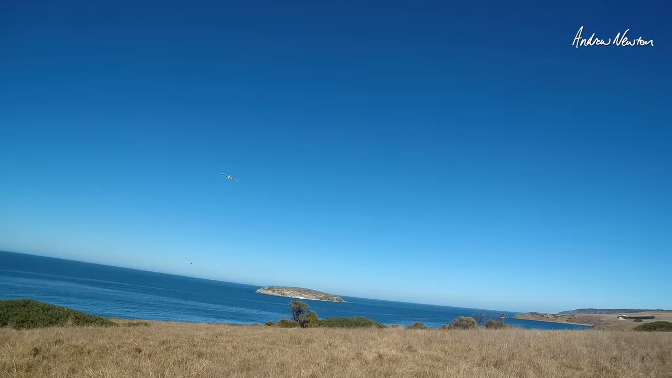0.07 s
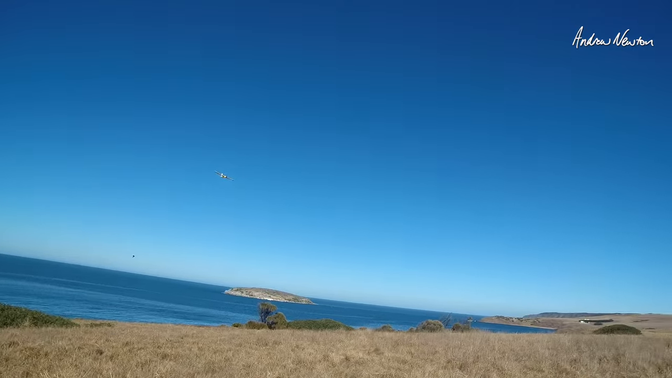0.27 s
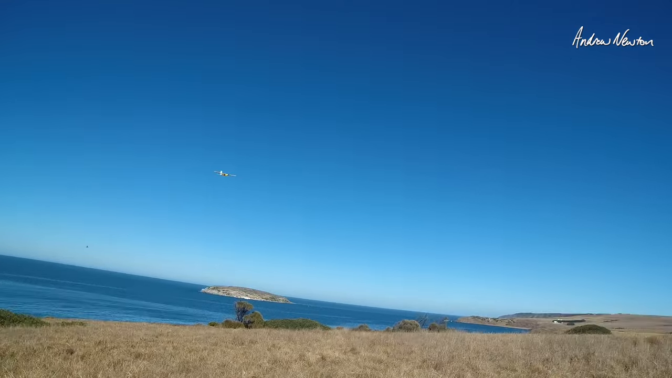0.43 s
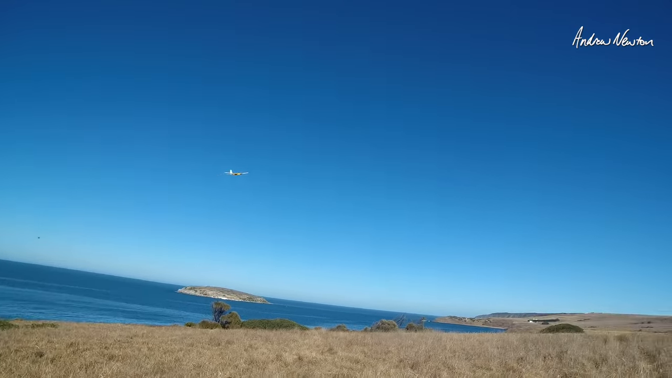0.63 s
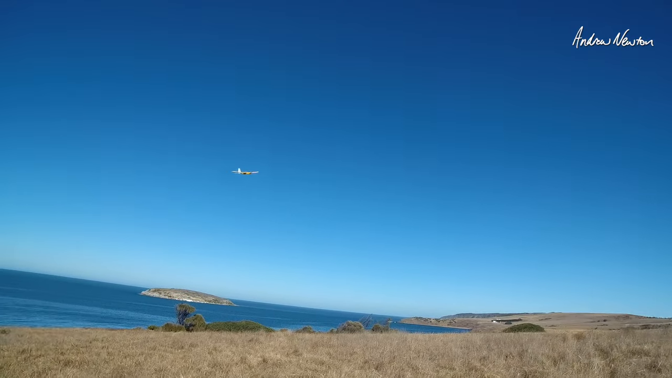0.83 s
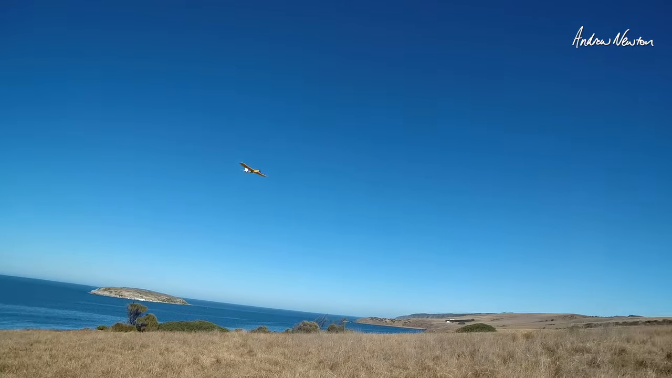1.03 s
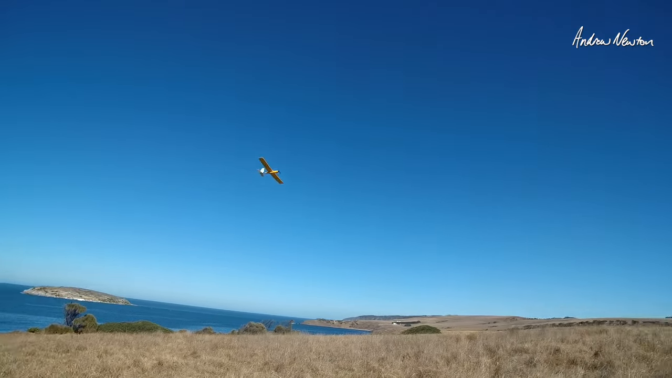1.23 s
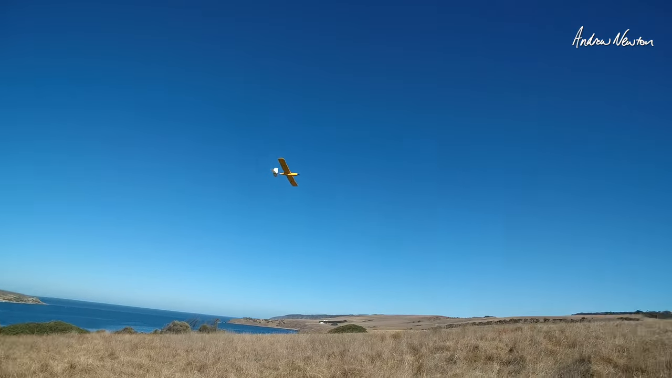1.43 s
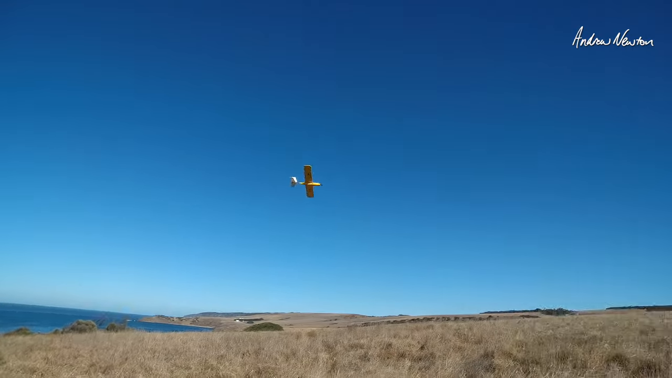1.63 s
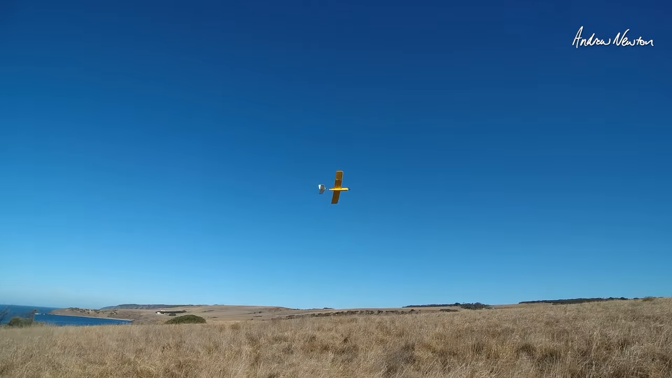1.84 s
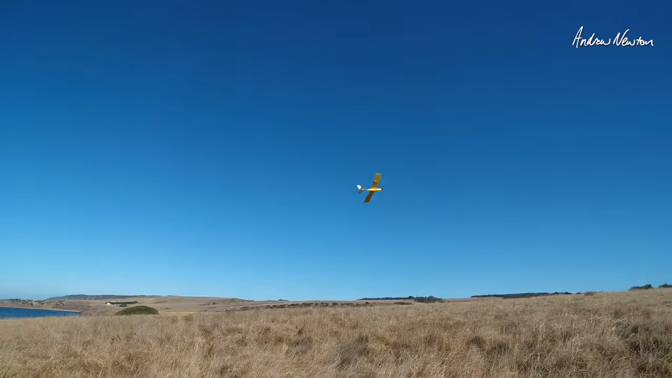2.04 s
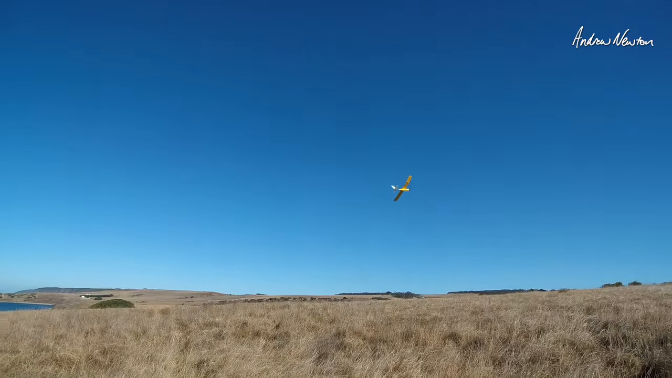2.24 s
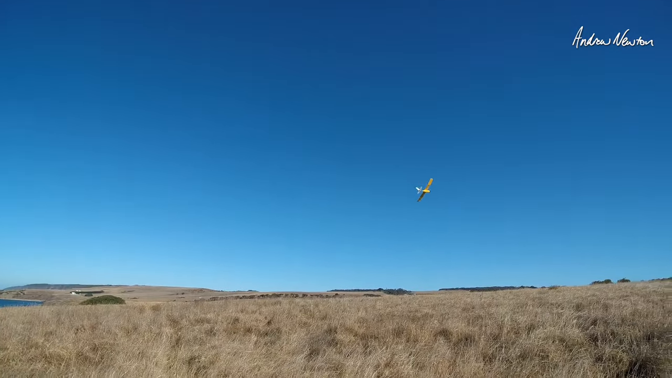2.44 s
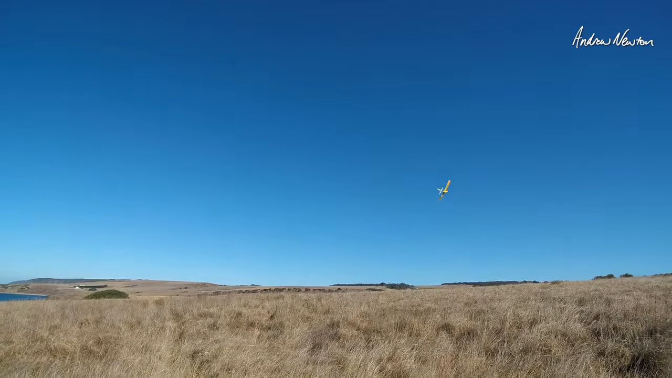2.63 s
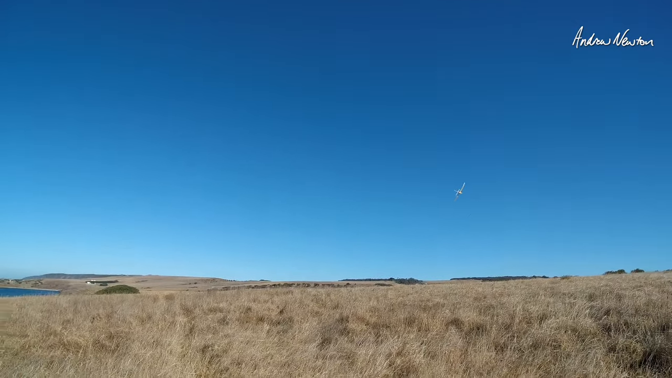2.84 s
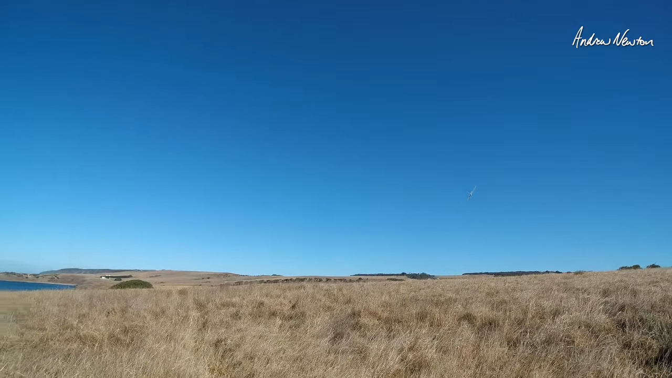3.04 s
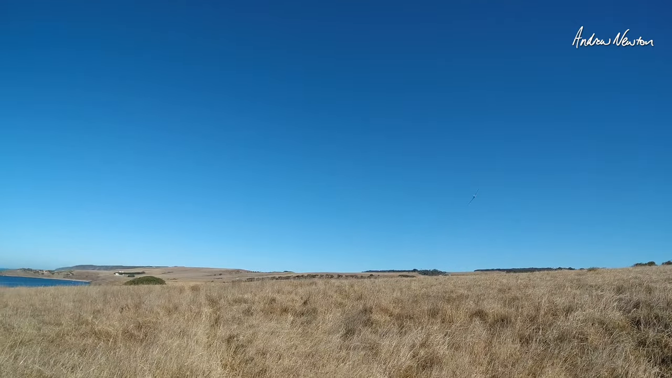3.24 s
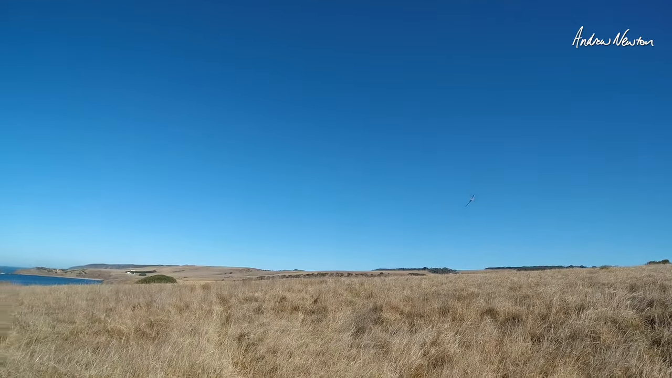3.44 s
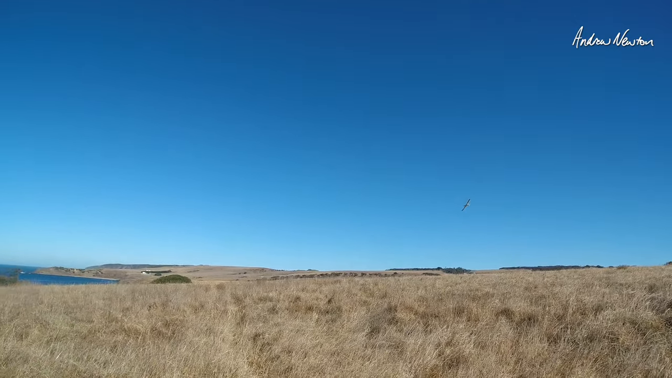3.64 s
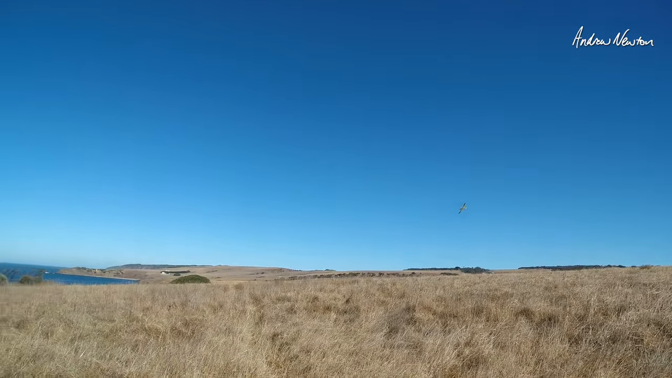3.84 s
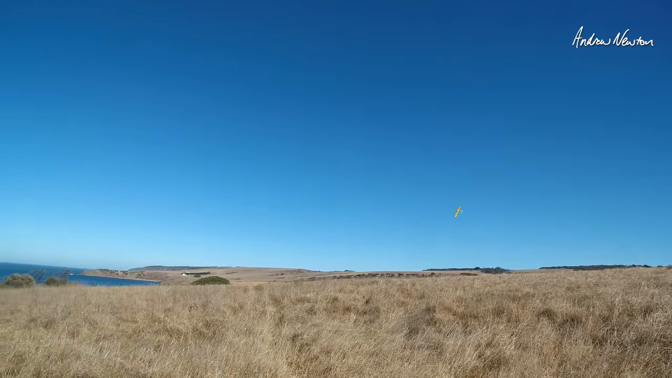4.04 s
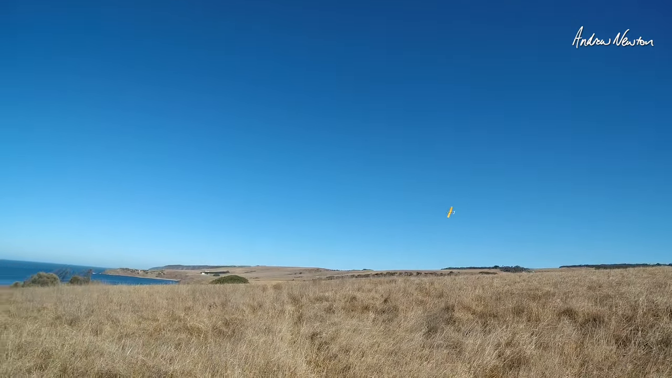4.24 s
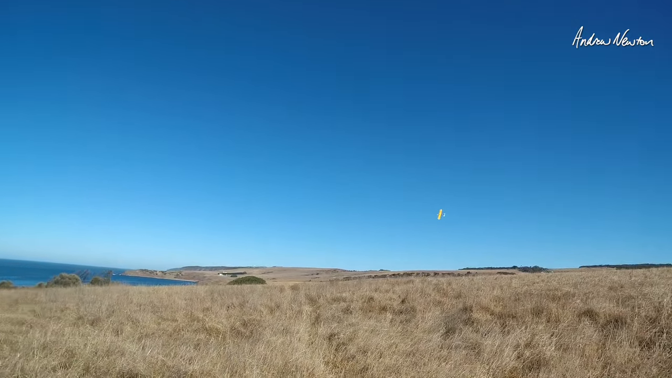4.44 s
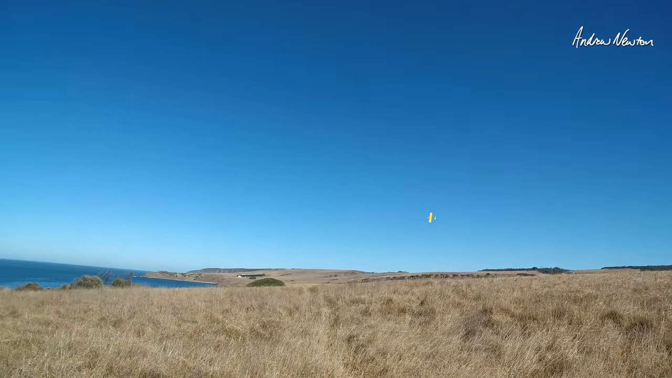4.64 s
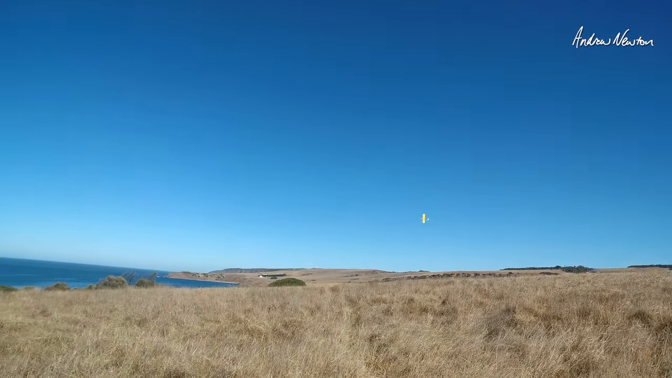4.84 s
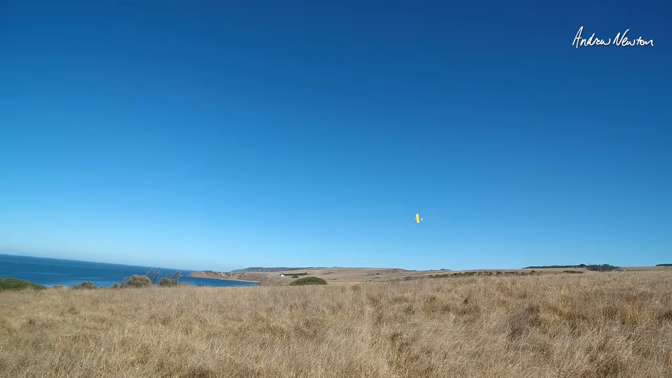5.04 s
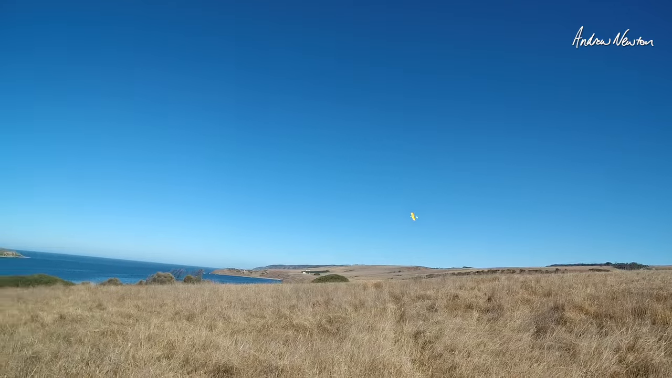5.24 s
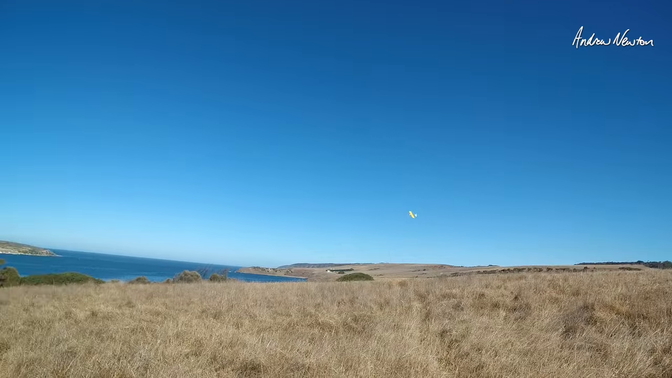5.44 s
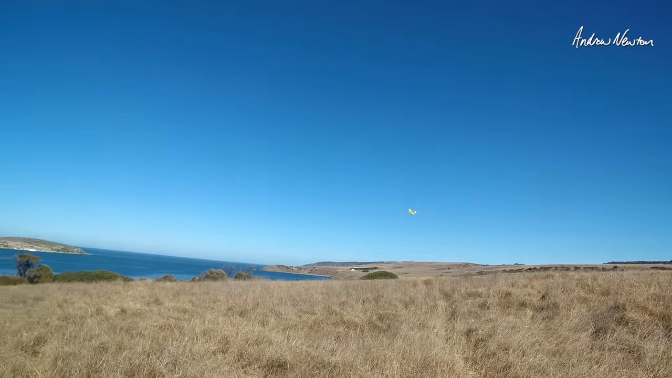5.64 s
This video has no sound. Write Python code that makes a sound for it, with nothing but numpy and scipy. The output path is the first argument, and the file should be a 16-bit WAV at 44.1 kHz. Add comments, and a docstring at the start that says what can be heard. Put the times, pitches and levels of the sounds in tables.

```python
"""A small electric model plane curves past over a grassy headland, about seven metres off at its closest.
Shaft-locked sines make its motor whine and propeller hum, and switching tones its controller's whistle;
these sink in pitch as it goes by, while its hiss, shaped noise, swells ahead and behind. Wind noise
buffets the microphone, gliding sines call as small birds in the grass and a struck set of resonances
clicks once nearby. Behind lies the steady noise of distant sea and grass."""
import sys
import numpy as np
from scipy import signal
from scipy.fft import rfft, irfft
from scipy.io import wavfile
from scipy.ndimage import uniform_filter1d, map_coordinates

SR = 44100
rng = np.random.default_rng(int(sys.argv[2]) if len(sys.argv) > 2 else 0)


def digitize_waveform(pressure):
    """Quantize a signal to 16-bit integers and store it at the path in sys.argv[1].

    Rows of a 2-D input are taken as channels; values are limited to [-1, 1].
    """
    field = np.atleast_2d(pressure).T
    bounded = np.clip(field, -1, 1)
    quanta = np.round(bounded * 32767).astype(np.int16)
    wavfile.write(sys.argv[1], SR, quanta)


N = 251370
TIME = np.arange(N) / SR   # s


def from_db(db):
    """Decibels to gain."""
    return 10 ** (np.asarray(db) / 20)


def rms_one(x):
    """Scale to unit power."""
    return x / np.sqrt(np.mean(x ** 2) + 1e-20)


def in_time(rows):
    """Each column of a curve, joined by straight lines."""
    s, *columns = np.transpose(rows)
    return [np.interp(TIME, s, column) for column in columns]


def drift(rate_hz):
    """Slow chance of spread 1: white noise through two equal low-pass poles at rate_hz."""
    step = 40   # samples between slow values
    pole = np.exp(-2 * np.pi * rate_hz * step / SR)
    draws = rng.standard_normal(N // step + 2002)
    slow = signal.lfilter([1], [1, -2 * pole, pole * pole], draws)[2000:]   # drop the settling
    return np.interp(np.arange(N) / step, np.arange(len(slow)), rms_one(slow))


def noise(spectrum):
    """Noise of unit power with the given colour, joined over log frequency."""
    hz, db = np.transpose(spectrum)
    bins = np.maximum(np.fft.rfftfreq(N, 1 / SR), 1)
    gain = from_db(np.interp(np.log(bins), np.log(hz), db))
    return rms_one(irfft(rfft(rng.standard_normal(N)) * gain, N))


def tone(cycles, db):
    """A sine of the given rms level, starting anywhere in its cycle."""
    return np.sqrt(2) * from_db(db) * np.sin(2 * np.pi * (cycles + rng.random()))


# colour of the distant wash: f/Hz, relative level/dB per Hz
FIELD_COLOUR = [(30, 9.5), (120, 6.5), (220, 1), (310, 3.5), (480, 2), (1000, -2.5), (1600, -8),
                (2200, -7.5), (3400, -14), (5000, -18), (7500, -21), (15500, -22)]


def distant_wash(level_db=-57):
    """Distant sea and grass, blended into steady coloured noise."""
    return from_db(level_db) * noise(FIELD_COLOUR)


# breeze in the grass: t/s, level/dB
BREEZE_LEVEL = [(0.0, -56.5), (.7, -61), (2.2, -59), (3.3, -66.5), (4.1, -64), (5.0, -60.5), (5.7, -60)]
# colour of rushing air, in the grass and round the airframe: f/Hz, relative level/dB per Hz
RUSH_COLOUR = [(200, 0), (450, 2.5), (800, 4.5), (1150, 4), (1550, 5.5), (2100, 1), (2800, -6), (3500, -17),
               (8000, -25.5)]


def breeze():
    """Moving air rushes softly through the grass."""
    return from_db(in_time(BREEZE_LEVEL)[0]) * noise(RUSH_COLOUR)


# gusts at the microphone: t/s, level/dB
GUST_LEVEL = [(0.0, -53), (0.06, -49.5), (1.4, -53), (1.51, -46.5), (1.55, -56), (1.59, -39), (1.87, -38),
              (1.92, -44.5), (2.02, -30.5), (2.05, -37), (2.16, -31), (2.22, -43.5), (2.3, -33.5),
              (2.54, -38.5), (2.62, -30.5), (3.0, -37.5), (3.03, -42), (3.08, -35.5), (3.38, -39.5),
              (3.46, -34), (3.48, -40), (3.54, -33), (3.68, -47), (4.68, -51), (5.08, -45), (5.7, -49)]
# colour of the wind rumble: f/Hz, relative level/dB per Hz
WIND_COLOUR = [(8.8, -5.5), (15, -7), (38, 1), (54, -0.5), (72, -1.5), (110, -8), (204, -23), (241, -31.5),
               (265, -28), (400, -45.5), (520, -76), (880, -120)]


def wind(lump_db=1.5, lump_hz=12):
    """Eddies at the microphone port: a lumpy rumble that follows the gusts."""
    gust_db, = in_time(GUST_LEVEL)
    eddies = noise(WIND_COLOUR)
    eddies = eddies / np.sqrt(uniform_filter1d(eddies ** 2, size=5000))   # the gust sets the slow level
    return from_db(gust_db + lump_db * drift(lump_hz)) * eddies


# whistles, slurred down: t/s, length/s, start f/Hz, end f/Hz, peak level/dB
WHISTLES = [(0.973, 0.19, 4670, 4500, -66.5), (1.95, 0.1, 4820, 4390, -71), (3.55, 0.12, 4650, 4530, -69.5),
            (5.6, 0.14, 4740, 4510, -71)]
# quick flicks: t/s, length/s, top f/Hz, floor f/Hz it falls towards, share of length rising, peak level/dB
CHIPS = [(.245, 0.078, 4800, 3950, .45, -73), (.31, 0.053, 5030, 4020, 0.22, -72),
         (2.555, 0.03, 5530, 4500, .15, -69), (2.59, .027, 5660, 4600, 0.81, -64),
         (2.635, .055, 5640, 4230, .2, -67), (2.745, 0.05, 5000, 4170, .3, -75),
         (3.503, 0.044, 5700, 4430, .25, -74), (3.545, 0.032, 5250, 4560, 0.24, -74),
         (3.955, 0.028, 5280, 4135, .45, -73), (4.585, 0.049, 5300, 4420, 0.46, -72)]


def birds(waver=0.0067, waver_hz=57):
    """Near-sine calls: whistles that droop at the end and chips that flick up, then fall."""
    out = np.zeros(N)
    unsteady = 1 + waver * drift(waver_hz)

    def call(u, hz, db):
        swell = 2 * np.sqrt(u * (1 - u))
        return tone(np.cumsum(hz * unsteady) / SR, db) * swell

    for s, length, start_hz, end_hz, db in WHISTLES:
        u = np.clip((TIME - s) / length, 0, 1)
        out += call(u, start_hz + (end_hz - start_hz) * u ** 2, db)
    for s, length, top_hz, floor_hz, rising, db in CHIPS:
        u = np.clip((TIME - s) / length, 0, 1)
        out += call(u, floor_hz + (top_hz - floor_hz) * np.exp(-3.5 * np.abs(u - rising)), db)
    return out


def resonance(x, hz, width_hz):
    """One resonance with gain about 1 on top."""
    r = np.exp(-np.pi * width_hz / SR)
    feedback = [1, -2 * r * np.cos(2 * np.pi * hz / SR), r * r]
    return signal.lfilter((1 - r * r) / 2 * np.array([1, 0, -1]), feedback, x)


# a small click, its rebound and a faint afterknock: t/s, impulse level/dB
CLICKS = [(0.8610, -37.5), (0.8649, -50), (0.948, -53)]
# the small plastic body it rings: f/Hz, level before the band-pass/dB, 60 dB decay/s
CLICK_MODES = [(960, -6, 0.077), (1454, 2, 0.028), (1600, 4.5, 0.026), (2020, -17, 0.041),
               (2950, -16, 0.006)]


def click(low_hz=1150, high_hz=2900, snap_hz=1800, snap_width_hz=520, snap_db=35):
    """A light contact snaps, and with its rebound rings a plastic body too small to radiate bass."""
    hits = np.zeros(N) + 1e-18
    for s, db in CLICKS:
        hits[round(s * SR)] = from_db(db)
    snap = resonance(resonance(hits, snap_hz, snap_width_hz), snap_hz, snap_width_hz)
    out = from_db(snap_db) * snap
    for hz, db, t60 in CLICK_MODES:
        r = np.exp(-np.log(1000) / (t60 * SR))
        w = 2 * np.pi * hz / SR
        out += from_db(db) * signal.lfilter([0, np.sin(w)], [1, -2 * r * np.cos(w), r * r], hits)
    body_band = signal.butter(2, [low_hz, high_hz], "band", fs=SR, output="sos")
    return signal.sosfilt(body_band, out)


AIRSPEED_M_PER_S, CLOSEST_M, SOUND_M_PER_S = 13.9, 6.87, 343
# the plane comes in, passes, banks away and turns back: t/s, speed towards the microphone/(m/s)
APPROACH = [(0.0, 13.5), (0.95, 11), (1.27, 8.5), (1.58, 2.5), (1.9, -7), (2.17, -11), (2.65, -13.5),
            (3.4, -13.5), (4.1, -9.5), (5.2, 0), (5.7, 3.5)]


def flight():
    """Doppler factor, distance (m) and angle from the nose (degrees), all from the speed of approach."""
    closing = uniform_filter1d(in_time(APPROACH)[0], size=7000, mode="nearest")   # rounds the corners
    travelled = -np.cumsum(closing) / SR
    metres = CLOSEST_M + travelled - travelled.min()
    angle = np.degrees(np.arccos(np.clip(closing / AIRSPEED_M_PER_S, -1, 1)))
    return 1 + closing / SOUND_M_PER_S, metres, angle


def beam(path, db, aim_deg, half_power_deg, depth_db, falloff):
    """Level in dB of a directional source on the plane: it sinks with distance and off its aim."""
    _, metres, angle = path
    lobe = .5 ** (((angle - aim_deg) / half_power_deg) ** 2)
    off_aim_db = 10 * np.log10(lobe + (1 - lobe) * from_db(-depth_db) ** 2)
    return db - falloff * 20 * np.log10(metres / CLOSEST_M) + off_aim_db


def through_air(x, flutter_db, flutter_hz, jitter_s):
    """Turbulence along the path makes level and arrival time waver."""
    late = jitter_s * SR * drift(flutter_hz)   # samples
    arriving = map_coordinates(x, [np.arange(N) - late], order=3, mode="nearest")
    return arriving * from_db(flutter_db * drift(flutter_hz))


# beams of the airframe and of the blades ahead and behind: level on aim at closest range/dB,
# aim from the nose/deg, off-aim angle for half power/deg, most lost off aim/dB, power of 1/distance
WHOOSH_BEAM = (-50.5, 90, 11, 8, 2.3)
HISS_FORE_BEAM = (-57.5, 30.5, 22, 24, 1.05)
HISS_AFT_BEAM = (-55, 163.5, 26, 16, 1.58)
# colour of the blade hiss ahead and behind: f/Hz, relative level/dB per Hz
HISS_FORE_COLOUR = [(2500, -9), (3700, -2), (4700, 1), (6200, 4), (8000, 4.5), (9100, 5.5), (9900, -2.5),
                    (12000, -5), (13200, -13), (16000, -5)]
HISS_AFT_COLOUR = [(2500, -27), (3700, -1), (4700, 8.5), (6200, 8.5), (7300, 5.5), (9000, 1.5),
                   (10500, 2.5), (12000, -4.5), (13200, -12), (16000, -28)]


def airflow(path):
    """The airframe whooshes mostly side-on and near; the blades hiss fore and aft of their plane."""
    whoosh = from_db(beam(path, *WHOOSH_BEAM)) * noise(RUSH_COLOUR)
    hiss_fore = from_db(beam(path, *HISS_FORE_BEAM)) * noise(HISS_FORE_COLOUR)
    hiss_aft = from_db(beam(path, *HISS_AFT_BEAM)) * noise(HISS_AFT_COLOUR)
    return whoosh + hiss_fore + hiss_aft


def scatter(share=0.26, rate_hz=35):
    """Gain that wavers around 1 by the given share."""
    return 1 + share * drift(rate_hz)


def fade(depth_db=4.5, rate_hz=2.7):
    """Slow random rise and fall of one line, in dB."""
    return depth_db * drift(rate_hz)


# two blades: multiple of shaft f, level relative to the beam/dB
BLADE_ORDERS = [(2, -1), (4, -15.5), (6, -22.5)]
# beams of the hum's fundamental and overtones: columns as for the airframe
HUM_BEAM = (-47, 80.5, 18, 8.5, 1.4)
HUM_OVERTONE_BEAM = (-47.5, 111, 23, 23, 0.9)


def propeller_hum(path, turns):
    """Two blades pass twice a turn; the overtones beam further aft, so they swell later."""
    fundamental_db, overtone_db = beam(path, *HUM_BEAM), beam(path, *HUM_OVERTONE_BEAM)
    out = np.zeros(N)
    for k, db in BLADE_ORDERS:
        beam_db = fundamental_db if k == 2 else overtone_db
        out += tone(k * turns, beam_db + db) * scatter()
    return out


# uneven magnets: multiple of shaft f, level relative to the buzz/dB, aim from the nose/deg
BUZZ_ORDERS = [(10, -11, 160), (11, -4, 120), (12, -4.5, 113), (13, 1.5, 124), (15, -3.5, 140),
               (16, -7, 140), (17, -6.5, 48), (18, -13, 150), (19, -23, 91), (20, -13.5, 115),
               (21, -25, 85), (22, -19, 151)]


def magnet_buzz(path, turns, level_db=-57.5, half_power_deg=36, depth_db=7.5, falloff=1):
    """Each order has its own aim from the nose, and also rises and falls slowly at random."""
    out = np.zeros(N)
    for k, db, aim_deg in BUZZ_ORDERS:
        order_db = beam(path, level_db + db, aim_deg, half_power_deg, depth_db, falloff) + fade()
        out += tone(k * turns, order_db) * scatter()
    return out


# the magnet whine swells and fades: t/s, level/dB
WHINE_LEVEL = [(0.0, -54.5), (0.54, -44), (0.72, -50.6), (1.23, -42.4), (1.38, -55), (1.53, -43),
               (1.8, -55.5), (1.86, -49), (2.22, -43), (2.34, -52), (2.67, -54), (2.82, -65), (2.91, -58.5),
               (3.24, -53), (3.45, -65.5), (3.87, -58.5), (4.11, -71.5), (4.56, -53), (5.69, -76)]


def magnet_whine(poles):
    """One cycle for each passing magnet, slightly unsteady in level."""
    return tone(poles, in_time(WHINE_LEVEL)[0]) * scatter(share=0.04)


# aft and fore beams of the thin overtones: columns as for the airframe
RING_BEAM = (-65, 138, 14, 18, 1.7)
RING_FORE_BEAM = (-68.5, 45, 23, 20, 3)


def ring_level(path):
    """The stronger of the aft and fore beams, in dB."""
    return np.maximum(beam(path, *RING_BEAM), beam(path, *RING_FORE_BEAM))


# thin overtones of the motor: multiple of shaft f, level relative to the beam/dB
RING_ORDERS = [(28, -16), (36, -5.5), (42, -5)]


def motor_ring(ring_db, turns):
    """High shaft orders ring thinly, each fading on its own."""
    return sum(tone(k * turns, ring_db + db + fade()) for k, db in RING_ORDERS)


# the switching tone beams in narrow lobes that sweep past: t/s, level/dB
SWITCH_LEVEL = [(0.0, -88), (0.33, -62.5), (0.51, -62.5), (0.81, -85), (0.96, -62), (1.11, -60),
                (1.26, -70), (1.44, -56), (1.65, -68), (1.77, -61), (1.86, -58.5), (2.19, -55), (2.61, -65),
                (2.67, -58), (3.06, -83), (3.36, -67.5), (3.69, -79), (3.78, -72.5), (4.38, -80),
                (4.53, -67.5), (4.71, -87.6), (5.34, -75.7), (5.43, -86), (5.69, -80.3)]
# the whistle below it is loudest side-on and vanishes tail-on: t/s, level/dB
SIDEBAND_LEVEL = [(0.0, -94), (.55, -73), (1.0, -71.5), (1.25, -63), (1.5, -63), (1.7, -58), (2.22, -66),
                  (2.8, -97), (3.4, -93), (4.4, -76.5), (4.7, -68.5), (5.4, -74.5), (5.7, -78)]


def controller_whistle(ring_db, poles, switches, ripple_db=-17, mirror_db=-2, mirror_harmonic=9):
    """The passing magnets modulate the switching current and put tones below it."""
    switch_db, = in_time(SWITCH_LEVEL)
    sideband_db, = in_time(SIDEBAND_LEVEL)
    out = tone(switches, switch_db)
    out += tone(switches - 2 * poles, sideband_db)
    out += tone(switches - poles, sideband_db + ripple_db)
    # a whine harmonic beats with the switching tone and gives a steeply gliding line
    return out + tone(mirror_harmonic * poles - switches, ring_db + mirror_db)


MAGNETS, SWITCH_HZ = 14, 8060   # switching rate before Doppler
# the motor eases off in the turn: t/s, shaft f before Doppler/Hz
SHAFT = [(0.0, 120.6), (0.3, 120.8), (0.52, 119.5), (1.0, 121.8), (1.2, 120.4), (2.05, 121.3),
         (2.45, 117.4), (3.25, 116.5), (3.7, 117.6), (4.2, 116.5), (4.6, 119.4), (5.7, 120.8)]


def motor(path):
    """Every line is tied to the turning shaft or to the controller's switching, with Doppler."""
    doppler = path[0]
    shaft_hz, = in_time(SHAFT)
    turns = np.cumsum(shaft_hz * doppler) / SR
    switches = np.cumsum(SWITCH_HZ * doppler) / SR
    poles = MAGNETS * turns
    ring_db = ring_level(path)
    low = magnet_whine(poles) + propeller_hum(path, turns) + magnet_buzz(path, turns)
    high = controller_whistle(ring_db, poles, switches) + motor_ring(ring_db, turns)
    # both waver in arrival time; only the high lines flutter in level
    low = through_air(low, flutter_db=0.0, flutter_hz=31, jitter_s=4e-6)
    high = through_air(high, flutter_db=2.14, flutter_hz=13.5, jitter_s=3e-6)
    return low + high


def scene():
    """Open air with no echoes: the headland, the wind at the microphone and the plane going by."""
    path = flight()
    headland = distant_wash() + breeze() + wind() + birds() + click()
    plane = airflow(path) + motor(path)
    return (headland + plane)[None]


def record(dry):
    """The top is cut steeply."""
    taps = signal.firwin(801, 15330, fs=SR)   # cutoff in Hz
    return signal.fftconvolve(dry, taps[None], mode="same", axes=1)


dry = scene()
out = record(dry)
digitize_waveform(out)
```